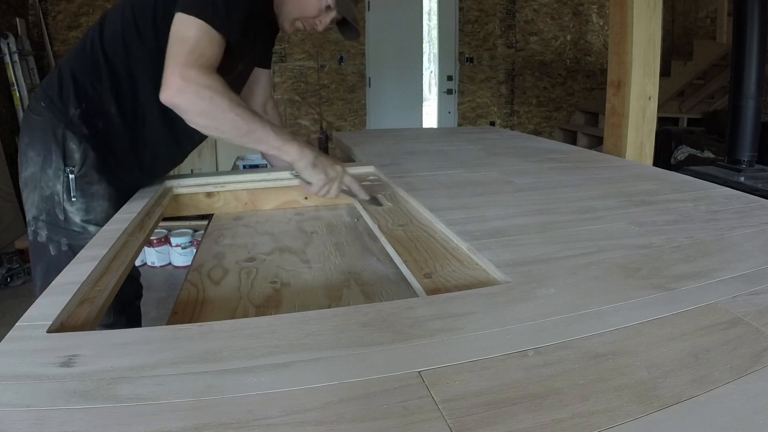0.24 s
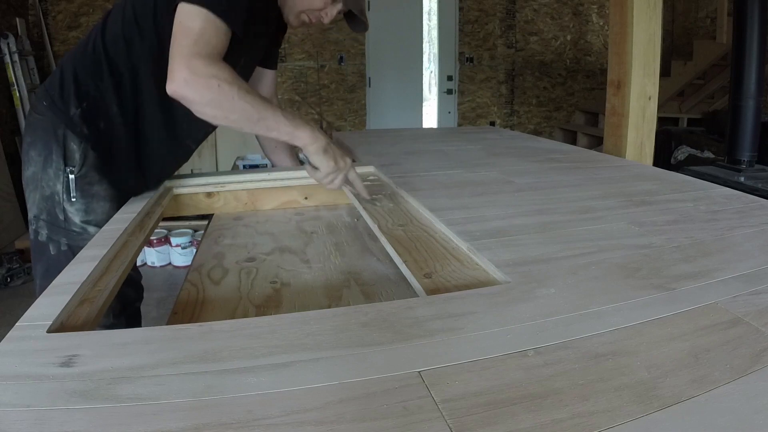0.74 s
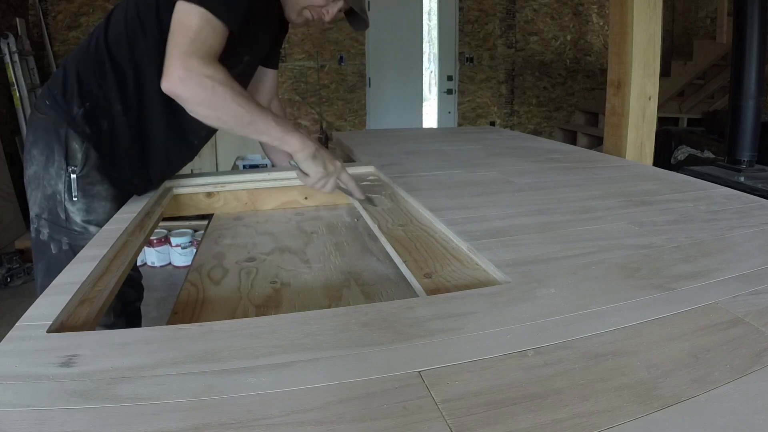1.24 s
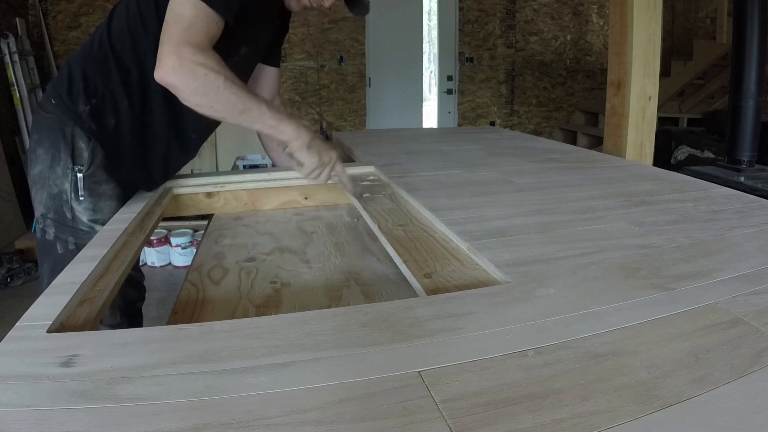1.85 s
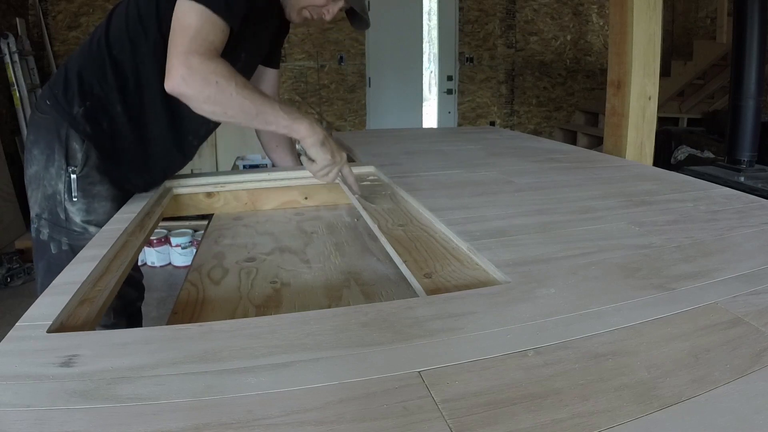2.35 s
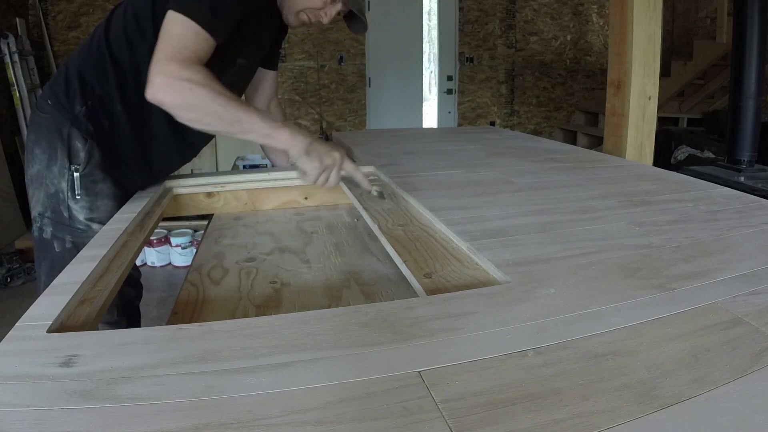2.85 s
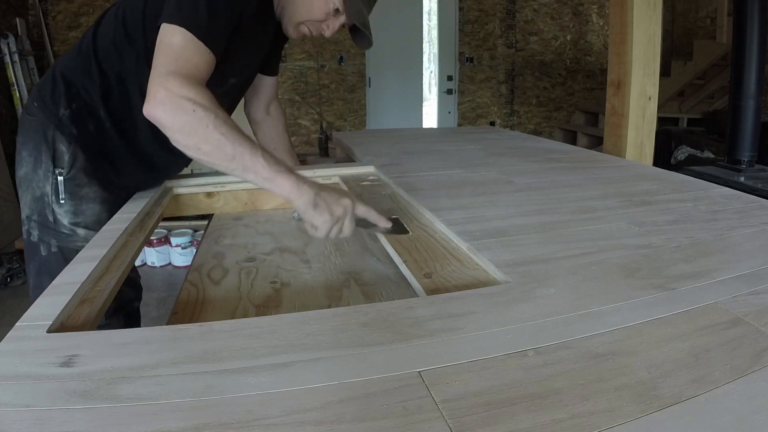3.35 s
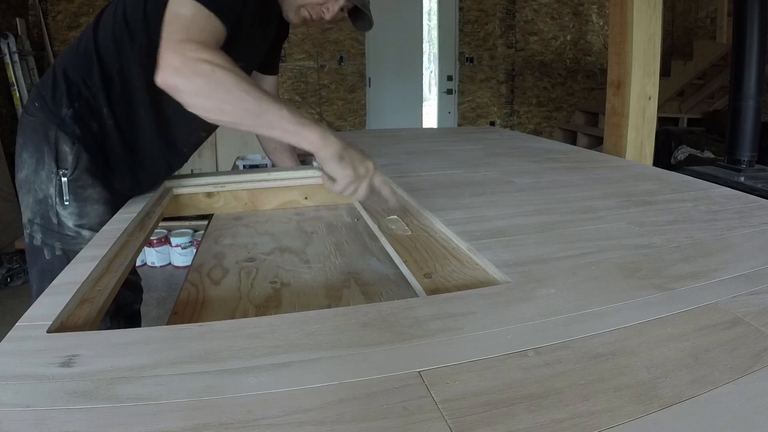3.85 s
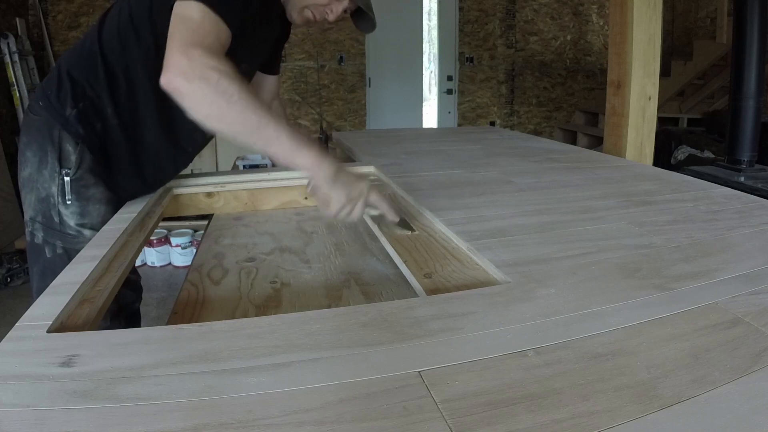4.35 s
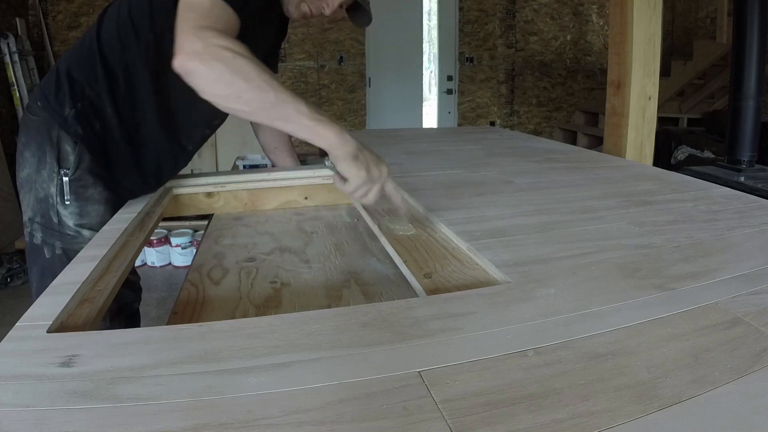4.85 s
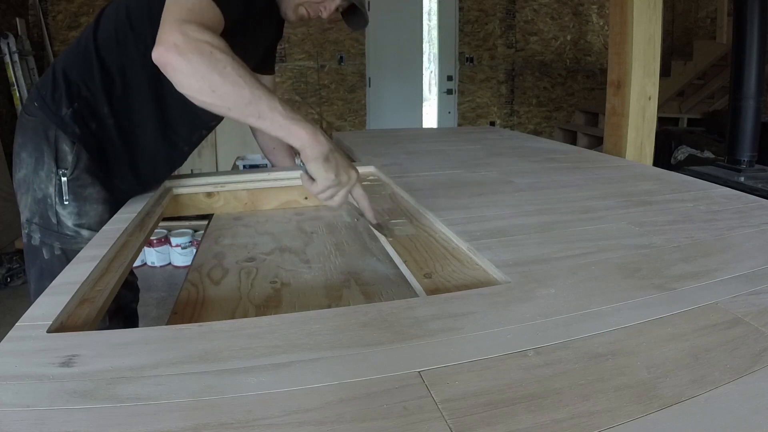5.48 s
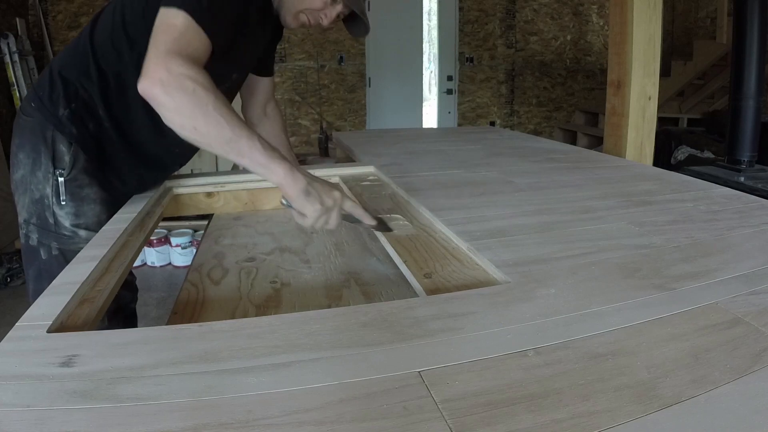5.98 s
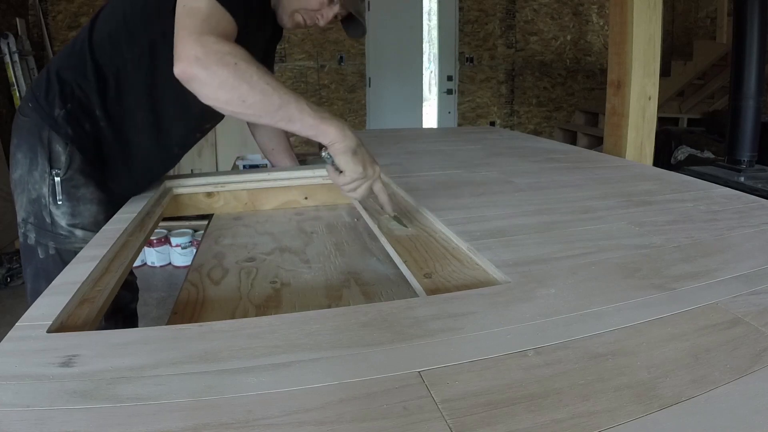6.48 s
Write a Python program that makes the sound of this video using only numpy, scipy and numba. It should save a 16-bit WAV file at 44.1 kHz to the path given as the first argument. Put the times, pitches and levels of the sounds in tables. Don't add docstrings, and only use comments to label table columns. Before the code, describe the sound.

A steel hand scraper works a hollow wooden panel in a bare workshop, heard from about two metres. It opens mid-stroke with a strong sharp rasp at 0.07 s. Knocks of the landing blade follow at about 0.25, 0.74 (faint), 1.2 (hard), 1.7 and 2.2 s, each with a short hollow wooden ring, leading into dry scrapes that swell and lift off near 0.55, 1.0, 1.45, 1.95 and 2.5 s, the last with a brief low squeak. A quieter gap follows, with light taps at 3.4 and a cluster of soft thumps around 3.6-3.7 s. A quick squeaky rasp comes at 3.8 s, then knocks at 4.0, 4.45 (the loudest), 5.0, 5.9 (weak) and 6.4 s, with gritty pulls peaking near 4.3, 4.8, 5.0, 5.6, 6.2, 6.5 and 6.7 s. Short wall reverberation, faint hum and hiss persist.

```python
import sys
import numpy as np
from scipy import signal
from scipy.fft import rfft, irfft
from scipy.io import wavfile
from scipy.ndimage import uniform_filter1d
from numba import njit

SR = 44100
rng = np.random.default_rng(int(sys.argv[2]) if len(sys.argv) > 2 else 0)


def transcribe(signal):
    frames = np.atleast_2d(signal).T
    limited = np.clip(frames, -1, 1)
    pcm = np.round(limited * 32767).astype(np.int16)
    wavfile.write(sys.argv[1], SR, pcm)


def convert_level_to_amplitude(level_db):
    exponent = np.asarray(level_db, float) / 20
    return 10 ** exponent


N = 296352


def unit(x):
    return x / np.sqrt(np.mean(x ** 2))


@njit
def resonator(x, hz, width):
    y, band, low = np.empty(len(x)), 0., 0.
    for i in range(len(x)):
        g = np.tan(np.pi * hz[i] / SR)
        damping = width / hz[i]
        v = (band + g * (x[i] - low)) / (1 + g * (g + damping))
        band = 2 * v - band
        low += 2 * g * v
        y[i] = damping * v
    return y


def body(x, peaks):
    total = np.zeros(len(x))
    for k, (hz, width, db) in enumerate(peaks):
        mode = resonator(x, np.full(len(x), 1. * hz), 1. * width)
        total += (-1) ** k * convert_level_to_amplitude(db) * unit(mode)
    return unit(total)


def walk(rate):
    hold = int(SR / rate)
    levels = np.repeat(rng.standard_normal(N // hold + 1), hold)
    return 0.7 * uniform_filter1d(levels, hold)[:N]


def add(out, s, x):
    i = int(s * SR)
    out[i:i + len(x)] += x[:N - i]


# frequency in Hz, level in dB per Hz.
HUM_COLOUR = [(20, -4), (90, -3.5), (130, -7), (220, -8.5), (550, -13.5), (5000, -30.5), (12500, -44.5),
              (15500, -51)]


def hum():
    hz, db = np.transpose(HUM_COLOUR)
    f = np.arange(1, N // 2 + 2) * SR / N
    colour = convert_level_to_amplitude(np.interp(np.log(f), np.log(hz), db))
    air = irfft(rfft(rng.standard_normal(N)) * colour, N)
    return unit(air) * convert_level_to_amplitude(-55 + 0.36 * walk(3.2))


# start in seconds, end in seconds, rasp level in dB, # panel
# rumble in dB relative to the rasp, cavity drone in dB relative to the rasp.
DRAG_STROKES = [(-.03, 0.057, -45, -17, 4.5), (0.306, .47, -58, -5, -1), (0.75, 0.955, -55.5, 1, -1),
                (1.284, 1.442, -57, 7, -2), (1.72, 1.877, -55, -18, -3), (1.871, 1.93, -55.5, 12, -3),
                (3.767, 3.836, -58.5, 17.5, -10), (4.19, 4.285, -56, 12.5, -3),
                (5.519, 5.602, -55.5, 14.5, 10.5), (6.657, 6.765, -60, 11.5, 8), (2.603, 2.713, -66, 4, 11),
                (2.226, 2.482, -60, -3, 5), (3.59, 3.786, -60, 10, 6), (4.05, 4.25, -52, -7, -17),
                (4.538, 4.747, -49.5, -9, -5), (5.07, 5.254, -54, 1, -7), (5.237, 5.584, -53.5, 6, 4),
                (5.905, 6.1, -58, 2, -14), (6.513, 6.707, -55.5, -2, -9)]


def drags(t):
    edge_s, sag_db_per_s, hiss_db = 0.031, 23, -11.5
    power = np.zeros((4, N))
    for start, end, db, rumble_db, drone_db in DRAG_STROKES:
        on = slice(int(max(start, 0) * SR), int(end * SR))
        ends = np.clip(np.minimum(t[on] - start, end - t[on]) / edge_s, 0, 1)
        shape = ends * convert_level_to_amplitude(db - sag_db_per_s * (t[on] - start))
        power[:, on] += np.outer(convert_level_to_amplitude([0, hiss_db, rumble_db, drone_db]), shape) ** 2
    return power


# middle in seconds, half-length in seconds, hiss level in dB.
SKIM_STROKES = [(0.055, 0.17, -59), (.5, 0.089, -51), (0.953, 0.23, -63), (1.42, 0.13, -55.5),
                (1.89, 0.079, -54), (2.26, 0.11, -61), (2.42, 0.11, -66), (2.51, .08, -57),
                (3.635, 0.33, -59), (3.778, 0.15, -53), (4.21, 0.15, -53), (4.662, 0.1, -53),
                (5.055, 0.12, -58), (5.32, 0.32, -66), (5.5, .12, -60.5), (5.63, 0.069, -67),
                (6.212, 0.065, -52.5), (4.776, .04, -54), (6.02, 0.14, -59.5), (6.105, 0.13, -54),
                (6.72, 0.12, -60)]


def skims(t):
    rasp_db, sharpness = -3, 3.9
    power = np.zeros((4, N))
    for s, length, db in SKIM_STROKES:
        on = slice(int(max(s - length, 0) * SR), int((s + length) * SR))
        shape = convert_level_to_amplitude(db) * np.abs(np.cos(np.pi / 2 * (t[on] - s) / length)) ** sharpness
        power[:2, on] += np.outer(convert_level_to_amplitude([rasp_db, 0]), shape) ** 2
    return power


# peak time in seconds, rasp level in dB, rise over 20 dB in seconds,
# fall over 20 dB in seconds, cavity drone in dB relative to the rasp.
BITE_STROKES = [(0.072, -32.5, 0.051, 0.014, -7.5), (0.551, -40, 0.096, 0.055, -2.5),
                (.992, -42, 0.19, 0.08, 2), (1.452, -43, 0.071, 0.094, 1),
                (1.897, -48.5, 0.071, 0.041, -10), (1.951, -43, 0.048, 0.036, 5),
                (2.515, -38.5, 0.059, 0.056, -3.5), (2.551, -36, 0.12, 0.032, -3.5),
                (3.785, -44, 0.1, .06, -2), (3.795, -36.5, 0.017, 0.014, -9),
                (4.266, -38.5, .13, 0.057, -2.5), (4.763, -38.5, 0.028, 0.047, -10),
                (4.995, -34, .015, 0.03, -12), (5.049, -41.5, 0.046, 0.05, -1),
                (5.643, -34.5, 0.14, 0.044, -1), (6.116, -50.5, 0.081, 0.071, -1.5),
                (6.203, -38.5, 0.035, 0.046, -7.5), (6.51, -41, 0.039, 0.075, -1),
                (6.74, -46, 0.13, 0.042, 5.5)]


def bites(t):
    hiss_db, rumble_db = -16.5, -10
    linger = 1.22
    power = np.zeros((4, N))
    for s, db, rise, fall, drone_db in BITE_STROKES:
        on = slice(int(max(s - 3 * rise, 0) * SR), int((s + 5 * fall) * SR))
        before = np.maximum(s - t[on], 0) / rise
        after = np.maximum(t[on] - s, 0) / fall
        steel_shape = convert_level_to_amplitude(db - 20 * (before + after))
        wood_shape = convert_level_to_amplitude(db - 20 * (before + after / linger))
        power[:2, on] += np.outer(convert_level_to_amplitude([0, hiss_db]), steel_shape) ** 2
        power[2:, on] += np.outer(convert_level_to_amplitude([rumble_db, drone_db]), wood_shape) ** 2
    return power


def efforts():
    t = np.arange(N) / SR
    return convert_level_to_amplitude(-4.0) * np.sqrt(1e-14 + drags(t) + skims(t) + bites(t))


def tears(spread_db, slip_db):
    size_db = spread_db * np.minimum(rng.exponential(size=N), 5)
    return rng.standard_normal(N) * convert_level_to_amplitude(size_db + slip_db * walk(90))


# frequency in Hz, width in Hz, level in dB.
RASP_MODES = [(790, 910, -3), (1133, 136, -1), (1334, 170, -3), (1920, 500, 0.5), (2200, 56, -6),
              (2736, 590, 0.5), (3330, 610, 2.5), (4400, 1300, -2.5)]
# frequency in Hz, width in Hz, level in dB.
HISS_MODES = [(4720, 2750, 2), (6180, 560, 2), (7640, 2200, -3.5), (10100, 900, -3.5), (12200, 5800, -2.5)]
# frequency in Hz, width in Hz, level in dB.
RUMBLE_MODES = [(126.9, 19, -2), (180, 99, -2.5), (211.3, 36, -0.5)]
# frequency in Hz, width in Hz, level in dB.
DRONE_MODES = [(328.5, 99, -1), (498, 79, 0), (635, 264, -5.5)]


def pulls():
    rasp_gain, hiss_gain, rumble_gain, drone_gain = efforts()
    pressed_hz, free_hz = 2050, 2580
    chatter_hz = pressed_hz + (free_hz - pressed_hz) * np.minimum(hiss_gain / rasp_gain, 1)
    chatter = unit(resonator(tears(2.85, 1.2), chatter_hz, 800.0))
    rasp = body(tears(3.5, 4.2), RASP_MODES) + convert_level_to_amplitude(-2.0) * chatter
    hiss = body(tears(0.71, 1.8), HISS_MODES)
    rumble = body(tears(2.8, 0.79), RUMBLE_MODES)
    drone = body(tears(5.04, 3.15), DRONE_MODES)
    grit = unit(convert_level_to_amplitude(1.6 * walk(260)))
    return grit * (rasp_gain * unit(rasp) + hiss_gain * hiss) + rumble_gain * rumble + drone_gain * drone


def ring(modes, scatter_db, rise_s):
    t = np.arange(SR // 3) / SR
    x = np.zeros(len(t))
    for hz, db, t60 in modes:
        strength, detune = rng.standard_normal(2)
        tone = np.sin(2 * np.pi * hz * (1 + 0.011 * detune) * t)
        x += convert_level_to_amplitude(db + scatter_db * strength) * tone * 1000 ** (-t / t60)
    x *= 1 - np.exp(-t / rise_s)
    return x / np.abs(x).max()


def radiated(peaks, size):
    f = np.arange(1, size // 2 + 2) * SR / size
    power = np.zeros(len(f))
    for hz, width, db in peaks:
        detuning = 1.85 * (f - hz ** 2 / f) / width
        power += convert_level_to_amplitude(2 * db) / width / (1 + detuning ** 2) ** 1.03
    return unit(np.roll(irfft(np.sqrt(power), size), SR // 500))


# frequency in Hz, width in Hz, level in dB.
BLADE_MODES = [(1120, 310, -4.5), (1363, 110, -5.5), (1864, 302, -0.5), (2200, 390, 0.5), (2876, 320, 0),
               (3290, 470, -2.5), (4200, 760, -7.5)]


def struck_blade(s, bright_db):
    modes = []
    for hz, width, db in BLADE_MODES:
        if 2500 < hz < 3700:
            db = db + bright_db
        if hz < 1500:
            db = db + 1 * np.sign((s - 3.5) * (1255 - hz))
        modes.append((hz, width, db))
    return modes


# frequency in Hz, width in Hz, level in dB.
EDGE_MODES = [(5040, 330, -5.5), (6030, 500, 6.5), (7230, 4800, 5), (8830, 2400, 4.5), (11000, 790, -5),
              (12860, 2100, -4.5)]
# frequency in Hz, level in dB, 60 dB decay in seconds.
BOOM_MODES = [(121.8, -2, 0.15), (189, -13.5, 0.076), (199.7, 0.5, 0.073), (250.6, -7, 0.082)]
# frequency in Hz, level in dB, 60 dB decay in seconds.
HOLLOW_MODES = [(349, -5.5, 0.06), (454, -3, 0.05), (502.6, 3.5, 0.056), (621, -3, 0.053)]
# start in seconds, blade peak in dB, then boom, hollow and edge in dB relative to the blade.
LANDINGS = [(0.249, -25, -8, -6.5, -47), (0.7378, -42, -3.5, -3.5, -13), (1.2177, -16, -13, -9, -23.5),
            (1.6635, -21, -11, -12, -26), (2.1926, -26, -13.5, -11.5, -21.5), (2.876, -45, -12, -27, -10),
            (3.9954, -21, -17, -12.5, -18), (4.4494, -12, -18.5, -12.5, -11),
            (4.9786, -24.5, -11, -11.5, -15), (5.8812, -39.5, -0.5, -1.5, -28),
            (6.4312, -18.5, -15, -10.5, -11)]


def knocks():
    near, far = np.zeros((2, N))
    t = np.arange(SR // 10) / SR
    for s, db, boom_db, hollow_db, edge_db in LANDINGS:
        bright_db = max(0.23 * (db + edge_db + 36.5), -4.5)
        spread_s = 0.0068 * np.clip((db + 59) / 26, .2, 1)
        envelope = np.clip(t / 0.00077, 0, 1) * np.exp(-(t / spread_s) ** 2)
        contacts = rng.standard_normal((2, len(t))) * envelope
        contacts[:, SR // 1500] += 5.5
        blade = struck_blade(s, bright_db)
        steel = body(contacts[0], blade)
        edge = body(contacts[1], EDGE_MODES)
        steel_gain = convert_level_to_amplitude(db) / np.abs(steel).max()
        edge_gain = convert_level_to_amplitude(db + edge_db + 4.0) / np.abs(edge).max()
        boom = convert_level_to_amplitude(boom_db + 3.5) * ring(BOOM_MODES, 3.3, 0.012)
        hollow = convert_level_to_amplitude(hollow_db + 1.5) * ring(HOLLOW_MODES, 1.3, 0.0038)
        wood = convert_level_to_amplitude(db) * (boom + hollow)
        add(near, s - .0008, steel_gain * steel + edge_gain * edge)
        add(far, s, steel_gain * radiated(blade, len(t)) + edge_gain * radiated(EDGE_MODES, len(t)))
        add(near, s, wood)
        add(far, s, wood)
    return near, far


# middle in seconds, length in seconds, pitch in Hz, glide in Hz,
# rms level in dB.
EDGE_SQUEAKS = [
    (0.505, 0.074, 6350, 0, -66),
    (0.538, .03, 4400, 11, -70),
    (0.844, .05, 2200, 0, -56.5),
    (1.0, .1, 5800, 0, -67),
    (2.557, 0.03, 1640, 0, -39),
    (2.729, .06, 1720, 4, -63),
    (3.794, 0.038, 2170, 7, -46.5),
    (3.785, 0.033, 3310, -300, -43),
    (5.746, 0.11, 4200, -100, -63),
    (6.107, .07, 3340, -350, -53.5),
]


def squeaks():
    out = np.zeros(N)
    for s, length, hz, glide_hz, db in EDGE_SQUEAKS:
        u = np.linspace(-.5, .5, int(length * SR))
        tone = unit(resonator(rng.standard_normal(len(u)), hz + glide_hz * u, 61.0))
        add(out, s - length / 2, convert_level_to_amplitude(db) * np.cos(np.pi * u) ** 2 * tone)
    return out


# start in seconds, peak in dB, pitch in Hz, 60 dB decay in seconds.
PANEL_BUMPS = [
    (0.728, -32.5, 148, 0.03),
    (0.945, -29, 475, 0.11),
    (3.383, -31.5, 130, 0.022),
    (3.392, -28, 340, 0.015),
    (3.601, -27.5, 166, 0.048),
    (3.618, -26, 220, 0.061),
    (3.651, -27, 200, 0.036),
    (3.681, -31.5, 231, 0.041),
    (3.716, -28.5, 165, 0.045),
    (5.884, -35.5, 910, 0.0068),
]


def bumps():
    out = np.zeros(N)
    for s, db, hz, t60 in PANEL_BUMPS:
        modes = [(hz, 3, t60)]
        modes += [(f, d - 6, t60) for f, d, _ in BOOM_MODES]
        modes += [(f, d - 14.5, t60) for f, d, _ in HOLLOW_MODES]
        add(out, s, convert_level_to_amplitude(db - 5.5) * ring(modes, 3.3, 0.0044))
    return out


# frequency in Hz, 60 dB decay in seconds, level in dB against direct.
WALL_TAIL = [(137, 0.72, -6), (231, 0.31, -1.5), (477, 0.44, -2), (1000, 0.42, 2.5), (2090, 0.46, -3.5),
             (4400, 0.43, -3.5), (8550, 0.29, -5.5), (13000, 0.34, -15)]
# delay in seconds, level in dB.
FIRST_ECHOES = [(.007, -15), (0.012, -12.5), (0.018, -19.5), (.031, -26)]


def workshop(near, far):
    t = np.arange(SR * 3 // 4) / SR
    onset = np.clip((t - .005) / 0.0033, 0, 1)
    response, heard = np.zeros(len(t)), near.copy()
    wall_hz, wall_t60, wall_db = np.transpose(WALL_TAIL)
    for hz in 90 * 2 ** (np.arange(23) / 3):
        t60 = np.interp(np.log(hz), np.log(wall_hz), wall_t60)
        db = np.interp(np.log(hz), np.log(wall_hz), wall_db)
        centre = np.full(len(t), hz)
        band = resonator(rng.standard_normal(len(t)), centre, hz / 3)
        band = resonator(band, centre, hz / 3)
        tail = band * onset * 1000 ** (-t / t60)
        response += tail * convert_level_to_amplitude(db) * np.sqrt(hz / SR / 2 / np.sum(tail ** 2))
    for s, db in FIRST_ECHOES:
        add(heard, s, convert_level_to_amplitude(db) * near)
    return heard + signal.fftconvolve(far, response)[:N]


def scene():
    air, pull = hum(), pulls()
    knock_near, knock_far = knocks()
    squeak, bump = squeaks(), bumps()
    near = knock_near + bump + pull + squeak
    far = knock_far + convert_level_to_amplitude(-1.5) * bump + convert_level_to_amplitude(-1) * pull + convert_level_to_amplitude(-5.5) * squeak
    return (workshop(near, far) + air)[None]


def band_limit(x):
    return signal.sosfilt(signal.butter(12, 16480, fs=SR, output="sos"), x)


def record(dry):
    top_cut = signal.ellip(8, .2, 31.0, 15250, fs=SR, output="sos")
    soft = signal.sosfilt(top_cut, dry)
    return band_limit(soft)


dry = scene()
out = record(dry)
transcribe(out)
```